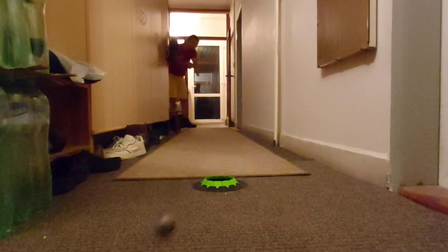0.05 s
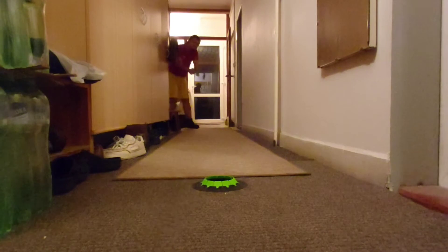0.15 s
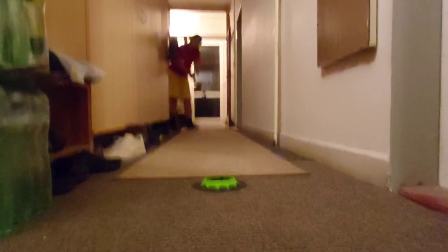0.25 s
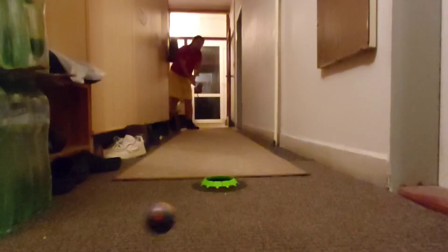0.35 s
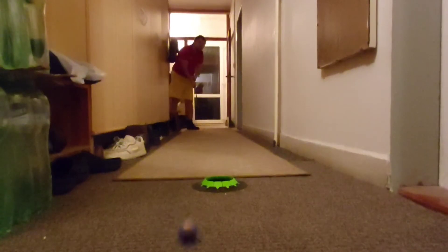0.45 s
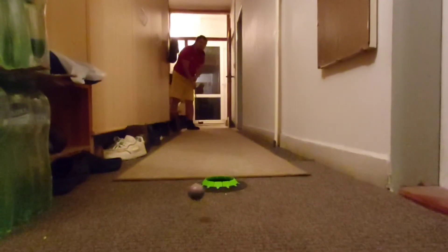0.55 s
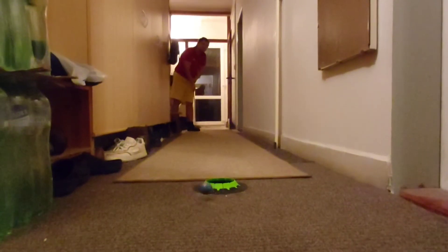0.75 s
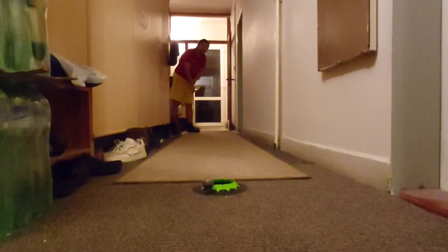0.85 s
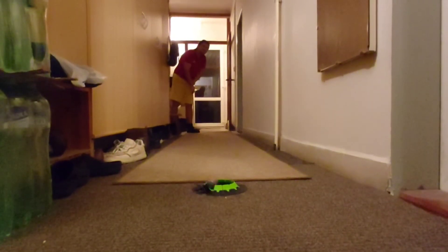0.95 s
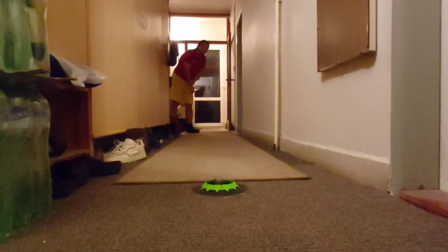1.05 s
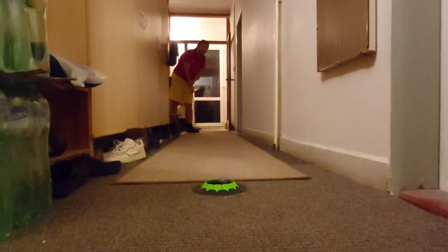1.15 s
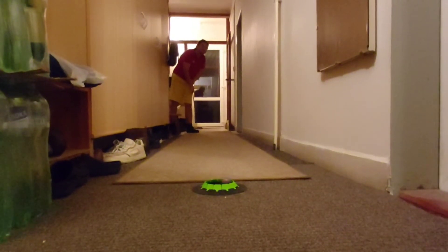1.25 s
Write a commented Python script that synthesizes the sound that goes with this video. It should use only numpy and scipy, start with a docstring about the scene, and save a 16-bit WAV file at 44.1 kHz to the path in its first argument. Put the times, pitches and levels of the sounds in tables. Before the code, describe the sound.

Sharp, very loud close wooden knock from a small ball after a couple of dull carpet bounces; the hallway rings briefly, then ever quieter thuds lead to a faint hollow plastic rattle, with low room rumble.

```python
"""A small hard ball knocks on a wooden board after bouncing along a carpeted hallway, then hops away in ever softer
thuds and rattles into a plastic ring. Board, floor and ring are struck banks of decaying sines; the crack, a faint
noise just before the knock, carpet ticks, shell clicks and rattle are coloured noise. The hallway rings on as noise
bands that each die at their own rate, over a low rumble and a faint hiss.
"""
import sys
import numpy as np
from scipy import signal
from scipy.fft import rfft, irfft
from scipy.io import wavfile
from scipy.ndimage import uniform_filter1d

SR = 44100
rng = np.random.default_rng(int(sys.argv[2]) if len(sys.argv) > 2 else 0)


def ratio(d):
    """dB to gain"""
    e = np.asarray(d, float) / 20
    return 10 ** e


def transcribe(signal):
    """Save signal, clipped to [-1, 1], as a 16-bit WAV file at the path in sys.argv[1]."""
    frames = np.atleast_2d(signal).T
    limited = np.clip(frames, -1, 1)
    pcm = np.round(limited * 32767).astype(np.int16)
    wavfile.write(sys.argv[1], SR, pcm)


N = 57330
T = np.arange(N) / SR

# Rumble spectrum. Each row: frequency in Hz, relative density in dB per Hz.
RUMBLE_COLOUR = [(25, -27), (50, 2), (90, 14.5), (160, 6.5), (310, 1), (500, -17), (800, -29), (1700, -50),
                 (4000, -53), (15000, -58)]
# Rumble loudness over time. Each row: time in seconds, level in dB.
RUMBLE_LEVEL = [(0, -55), (.1, -42), (.22, -51.5), (.55, -50), (.65, -53), (.78, -59), (.85, -53),
                (.92, -54), (1.0, -62), (1.3, -63.5)]
RUMBLE_WIDTH = 0.33  # side to mid
# Hiss spectrum. Each row: frequency in Hz, relative level in dB.
HISS_COLOUR = [(600, -4), (2500, 3.5), (5000, 3.5), (7800, 5), (8500, -8.5), (15000, -11.5)]
# Hiss loudness over time. Each row: time in seconds, level in dB.
HISS_LEVEL = [(0, -79), (.14, -75), (.2, -63), (.24, -60), (.3, -77), (.6, -91.5), (1.3, -89.5)]

# Hallway tail. Each row: frequency in Hz, level in dB, t60 in seconds, left-right likeness from 0 to 1.
HALL = [(45.83, -41.5, 0.2, 0.5), (67.2, -21.5, 0.65, 0.09), (115, -27, 0.32, 0.3), (162, -28.5, 0.52, .4),
        (225, -31, 0.6, 1), (341.3, -22, 0.38, 0.1), (500, -27.5, 0.4, 0.2), (710, -36.5, 0.56, 0),
        (925.7, -37.5, .48, 0.02), (2050, -40.5, 0.54, 0), (4070, -48.5, 0.47, 0), (7960, -49.5, 0.38, 0),
        (13700, -54.5, .28, 0.2)]
HALL_RISE_S, HALL_RISE_CYCLES = 0.0015, 2.5  # the bass builds up late
HALL_PATCHY_DB, HALL_PATCH_S = 3, 0.02  # uneven late reflections
EARLIER_S, EARLIER_DB = 0.091, -13.5  # an earlier landing still rings: how long ago, level
HOP_WET_DB = -0.5

# Hops on the carpet. Each row: start in seconds, thud in dB, boom in dB, tick in dB, left minus right in dB.
HOPS = [(0.012, -38.5, -35, -83, -5.5), (0.113, -26.5, -24, -35, -1.5), (0.295, -24.5, -34, -53, 26),
        (0.373, -27, -32, -32, 10.5), (0.415, -33.5, -31.5, -53, 7.5), (.486, -35.5, -42.5, -56, -4),
        (0.519, -36.5, -36, -37, -4.5), (0.65, -41.5, -68, -58.5, -19.5), (.729, -45.5, -37.5, -61, -6.5),
        (.806, -43.5, -51, -65, -13), (0.872, -59, -40.5, -82, -6), (.946, -45.5, -45, -49.5, -3.5),
        (1.077, -45, -50.5, -53.5, 4), (1.205, -45, -49.5, -53, 3.5)]
# Floor modes under the carpet. Each row: frequency in Hz, level in dB, t60 in seconds.
FLOOR_MODES = [(200, -4.5, 0.017), (322.7, -6, 0.091), (456, -5.5, 0.035), (518, -16, 0.076),
               (706.7, -16, 0.058), (895, -28.5, 0.072), (1147, -21.5, 0.04), (1767, -29, 0.045),
               (1940, -33.5, 0.03)]
# Deep boom of the boards. Each row: frequency in Hz, level in dB, t60 in seconds.
BOOM_MODES = [(68, -5.5, 0.18), (112.5, -6, 0.4), (134, 3.5, 0.11)]
# Tick on the pile. Each row: frequency in Hz, relative level in dB.
TICK_COLOUR = [(300, 12.5), (800, 8), (1700, 0.5), (3000, -15), (5000, -24.5), (9000, -28.5), (15000, -38)]
THUD_SWELL_S, BOOM_SWELL_S, TICK_T60_S = 0.004, 0.01, 0.055
THUD_PUSH_MS = 0.15  # dulls what the landings send into the hallway

# Contacts of ball and board. Each row: start in seconds, level in dB, push in milliseconds.
KNOCKS = [(.2451, -0.5, 0.023), (.2462, 7.5, 0.21), (.2474, -1, 0.063), (.2513, -10, 0.14)]
# Board modes. Each row: frequency in Hz, left level in dB, right level in dB, longest t60 in seconds.
BOARD_MODES = [(126.5, -29.5, -35.5, 0.96), (158, -16, -23.5, 0.1), (241, -17.5, -14, 0.04),
               (314.3, -24.5, -18, .16), (386, -34, -26.5, .07), (514, -18, -15, 0.09),
               (640, -1, -18.5, 0.021), (800, -0.5, -16.5, 0.025), (1135, -8, -23, 0.024),
               (1475, -23.5, -26, .025), (1848, -10.5, -9.5, 0.035), (2094, -11.5, -17, .025),
               (2814, -1.5, -16, 0.025), (3250, -29, -28.5, 0.012), (4180, -7, -15.5, .03),
               (5130, -29, -25.5, 0.01)]
MAX_CYCLES = 45  # caps each board t60 at this many cycles
# Bright crack of the contact. Each row: frequency in Hz, relative level in dB.
CRACK_COLOUR = [(1400, -10), (2000, 9.5), (3300, -5), (4150, 4.5), (5000, -23.5), (6500, -5.5),
                (9500, -15.5), (13000, -11.5), (15000, -12.5), (15800, -42.5)]
CRACK_DB, CRACK_T60_S = (-6, -8.5), 0.015  # left and right level against the contact
CRACK_LOSS_DB = 16  # each later contact cracks less
# Faint short noise just before the knock. Each row: frequency in Hz, relative level in dB.
LEAD_NOISE_COLOUR = [(400, 3.5), (1200, -9), (2500, 1.5), (4200, -9), (6000, -33.5)]
LEAD_NOISE_S, LEAD_NOISE_DB = 0.2395, -26  # start, level
KNOCK_LOW_HZ = 85  # the small board radiates no deep bass

# Bright clicks of the hard shell. Each row: start in seconds, level in dB.
CLICKS = [(.486, -61.5), (.805, -67), (.967, -57), (1.079, -71), (1.205, -70)]
# Click spectrum. Each row: frequency in Hz, relative level in dB.
CLICK_COLOUR = [(1500, -1), (2500, -18), (4500, 1), (7000, -4.5), (10000, -14), (15000, -21)]
CLICK_RISE_S, CLICK_T60_S = 0.002, 0.045

# Hollow notes of the plastic ring. Each row: start in seconds, level in dB.
RING_NOTES = [(0.947, -31.5), (1.081, -32)]
RING_HZ, RING_SWELL_S, RING_T60_S, RING_PAN_DB = 321, 0.014, 0.079, -10
# Rattles of the plastic ring. Each row: start in seconds, level in dB, rise in seconds, t60 in seconds.
RATTLES = [(0.95, -48.5, 0.027, 0.241), (1.079, -61.5, .002, 0.13), (1.108, -70, 0.0022, 0.081),
           (1.123, -73, 0.0021, 0.21)]
# Rattle spectrum. Each row: frequency in Hz, relative level in dB.
RATTLE_COLOUR = [(700, -1), (1500, 9.5), (2100, 10), (2800, -2), (3600, 5), (4500, -5), (6000, -5),
                 (7500, -9), (14000, -19)]
RATTLE_PER_S, RATTLE_SPREAD_DB, RATTLE_PAN_DB = 6000, 2, -5  # mean click rate, uneven click level

SOFT_CLIP = 0.95  # full-scale amplitude that peaks bend towards
LOW_CUT_HZ, TOP_HZ = 45, 15200


def stereo_noise():
    """Independent white noise for left and right."""
    return rng.standard_normal((2, N))


def read(table, hz, col=1):
    """Table column at given frequencies, on a log axis."""
    a = np.array(table, float)
    return np.interp(np.log(hz), np.log(a[:, 0]), a[:, col])


def level_curve(table):
    """Gain over time from (s, dB) points."""
    return ratio(np.interp(T, *np.array(table).T))


def colour(x, table):
    """Filter by a (Hz, dB) spectrum, to rms 1."""
    hz = np.maximum(np.fft.rfftfreq(N, 1 / SR), 1)
    y = irfft(rfft(x) * ratio(read(table, hz)), N)
    return y / np.sqrt(np.mean(y ** 2))


def swell(s, rise):
    """Smooth rise from time s."""
    return 1 - np.exp(-np.maximum(T - s, 0) / rise)


def fade(t, t60):
    """Decay by 60 dB in t60 seconds, starting at t = 0."""
    return (t >= 0) * np.exp(-np.log(1000) * np.maximum(t, 0) / t60)


def ring(modes, s, gains=1):
    """Decaying sines struck at time s."""
    out = 0
    for gain, (hz, db, t60) in zip(gains * np.ones(len(modes)), modes):
        out = out + gain * ratio(db) * fade(T - s, t60) * np.sin(2 * np.pi * hz * (T - s))
    return out


def push(x, ms):
    """A longer contact dulls the blow: two equal one-pole low-passes."""
    a = np.exp(-1000 / (max(ms, 0.01) * SR))
    once = signal.lfilter([1 - a], [1, -a], x)
    return signal.lfilter([1 - a], [1, -a], once)


def pan(x, db):
    """Tilt the balance to left minus right in dB."""
    return x * ratio(np.array([[db], [-db]]) / 2)


def background():
    """Low rumble of the house and a faint treble hiss, as noise with moving levels."""
    mid, side = stereo_noise()
    wide = np.array([mid + RUMBLE_WIDTH * side, mid - RUMBLE_WIDTH * side])
    rumble = colour(wide, RUMBLE_COLOUR) * level_curve(RUMBLE_LEVEL)
    hiss = colour(stereo_noise(), HISS_COLOUR) * level_curve(HISS_LEVEL)
    return rumble + hiss


def patches():
    """Slow random wander, spread 1."""
    k = int(HALL_PATCH_S * SR)
    x = uniform_filter1d(uniform_filter1d(rng.standard_normal(N), k), k)
    return x / x.std()


def hall():
    """The hallway's answer to a blow: third-octave noise bands, each dying at its own rate."""
    f, out = np.fft.rfftfreq(N, 1 / SR), 0
    mid, side = rfft(stereo_noise())
    for hz in 32 * 2 ** np.arange(0, 9, 1 / 3):
        band = np.clip(1 - np.abs(3 * np.log2(np.maximum(f, 1) / hz)), 0, 1)
        band = band * np.sqrt(SR / hz)  # evens out the narrower low bands
        like = np.clip(read(HALL, hz, col=3), 0, 1)
        m = irfft(mid * band, N) * np.sqrt(1 + like)
        d = irfft(side * band, N) * np.sqrt(1 - like)
        envelope = fade(T, read(HALL, hz, col=2)) * swell(0, HALL_RISE_CYCLES / hz) ** 2
        envelope = envelope * ratio(HALL_PATCHY_DB * patches())
        out = out + ratio(read(HALL, hz)) * envelope * np.array([m + d, m - d])
    return out * swell(0, HALL_RISE_S)


def hops():
    """Soft landings: floor modes, a boom of the boards and a tick on the pile."""
    out, noise = 0, colour(stereo_noise(), TICK_COLOUR)
    for s, thud_db, boom_db, tick_db, pan_db in HOPS:
        # each landing excites the modes a little differently
        signs = rng.choice([-1, 1], len(FLOOR_MODES))
        gains = signs * ratio(2 * rng.standard_normal((2, len(FLOOR_MODES))))
        thud = ratio(thud_db) * np.array([ring(FLOOR_MODES, s, g) for g in gains])
        tick = ratio(tick_db) * noise * fade(T - s, TICK_T60_S)
        boom = ratio(boom_db) * ring(BOOM_MODES, s) * swell(s, BOOM_SWELL_S)
        out = out + pan((thud + tick) * swell(s, THUD_SWELL_S) + boom, pan_db)
    return out


def knock():
    """The ball chatters on the board: each contact rings the wood's modes and cracks; faint noise leads in."""
    lead_noise = colour(stereo_noise(), LEAD_NOISE_COLOUR) * swell(LEAD_NOISE_S, 0.0012)
    out = ratio(LEAD_NOISE_DB) * lead_noise * (T < KNOCKS[0][0])
    crack, i = colour(stereo_noise(), CRACK_COLOUR), np.arange(len(BOARD_MODES))
    middle = (i > 4) * (i < 9)
    for k, (s, db, ms) in enumerate(KNOCKS):
        for c in range(2):
            modes = [(m[0], m[1 + c], min(m[3], MAX_CYCLES / m[0])) for m in BOARD_MODES]
            # every other mode flips on every other contact; every other middle mode is opposite at right
            sign = (-1.0) ** (k * i + c * i * middle)
            wood = push(ring(modes, s, sign), ms)
            snap = ratio(CRACK_DB[c] - CRACK_LOSS_DB * k) * crack[c] * fade(T - s, CRACK_T60_S)
            out[c] += ratio(db) * (wood + snap)
    return signal.sosfilt(signal.butter(4, KNOCK_LOW_HZ, "high", fs=SR, output="sos"), out)


def shell():
    """Short bright noise clicks where the ball meets something hard."""
    envelope = sum(ratio(db) * swell(s, CLICK_RISE_S) * fade(T - s, CLICK_T60_S) for s, db in CLICKS)
    return colour(stereo_noise(), CLICK_COLOUR) * envelope


def plastic_ring():
    """The plastic ring hums a hollow note, one decaying sine, and rattles in fine random clicks."""
    hollow = [(RING_HZ, 0, RING_T60_S)]
    note = sum(ratio(db) * swell(s, RING_SWELL_S) * ring(hollow, s) for s, db in RING_NOTES)
    clicks = (rng.random((2, N)) < RATTLE_PER_S / SR) * stereo_noise()
    clicks = clicks * ratio(RATTLE_SPREAD_DB * rng.exponential(size=(2, N)))
    envelope = sum(ratio(db) * swell(s, rise) * fade(T - s, t60) for s, db, rise, t60 in RATTLES)
    rattle = envelope * colour(clicks, RATTLE_COLOUR)
    return pan(note, RING_PAN_DB) + pan(rattle, RATTLE_PAN_DB)


def scene():
    """Near sounds, the hallway's answer to the knock and each hop, and the background."""
    blow, soft = np.zeros((2, N))
    blow[int(KNOCKS[0][0] * SR)] = 1
    for s, thud_db, *_ in HOPS:
        soft[int(s * SR)] = ratio(thud_db + HOP_WET_DB)
    send, answer = blow + push(soft, THUD_PUSH_MS), hall()
    echo = signal.fftconvolve(send[None], answer, axes=1)[:, :N]
    # the earlier landing is heard from partway through its tail
    ago = int(EARLIER_S * SR)
    tail = push(answer, THUD_PUSH_MS)[:, ago:]
    earlier = ratio(EARLIER_DB) * np.pad(tail, ((0, 0), (0, ago)))
    return background() + earlier + echo + hops() + knock() + shell() + plastic_ring()


def roll_off(x):
    """The treble ends steeply here."""
    return signal.sosfilt(signal.butter(12, 15640, fs=SR, output="sos"), x)


def record(dry):
    """The recorder rounds the loudest peaks and cuts the deep bass and the top."""
    rounded = SOFT_CLIP * np.tanh(dry / SOFT_CLIP)
    mix = signal.sosfilt(signal.butter(3, LOW_CUT_HZ, "high", fs=SR, output="sos"), rounded)
    mix = signal.sosfilt(signal.ellip(8, 0.2, 60, TOP_HZ, fs=SR, output="sos"), mix)
    return roll_off(mix)


dry = scene()
out = record(dry)
transcribe(out)
```